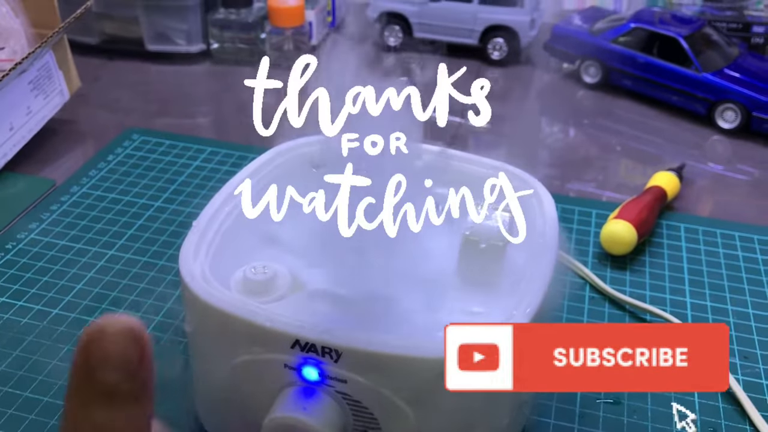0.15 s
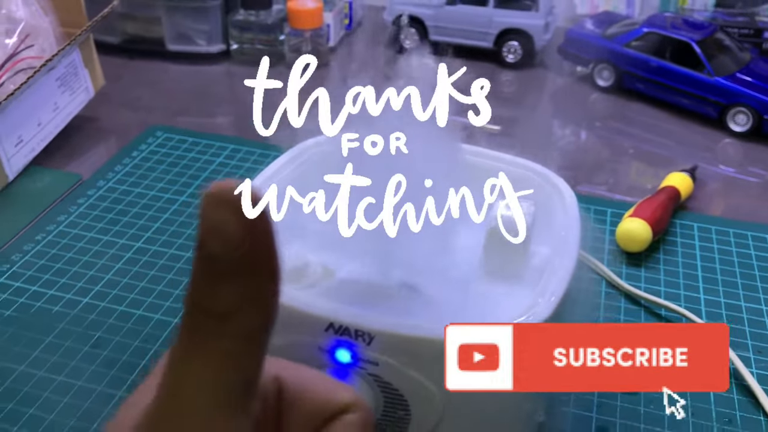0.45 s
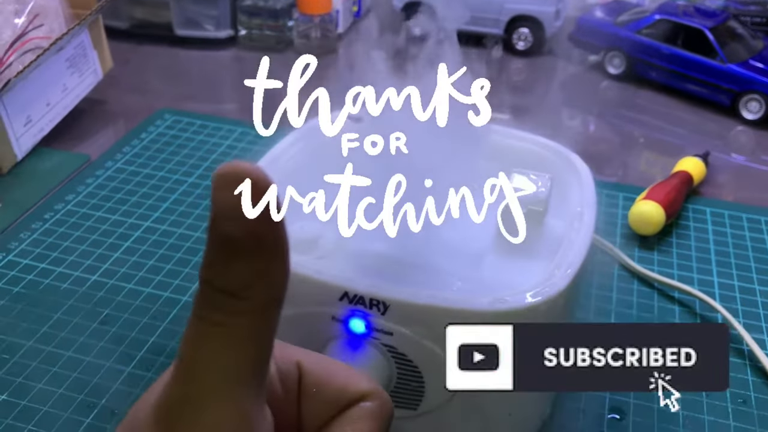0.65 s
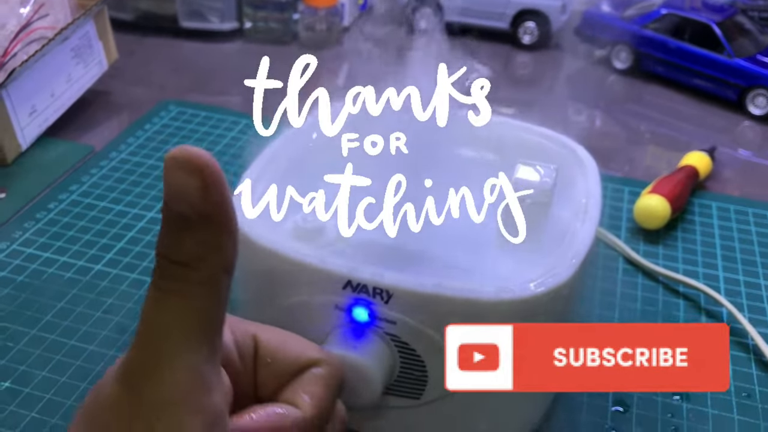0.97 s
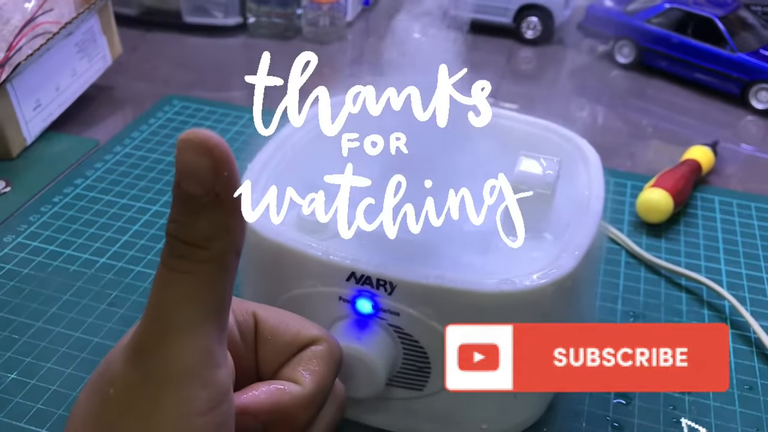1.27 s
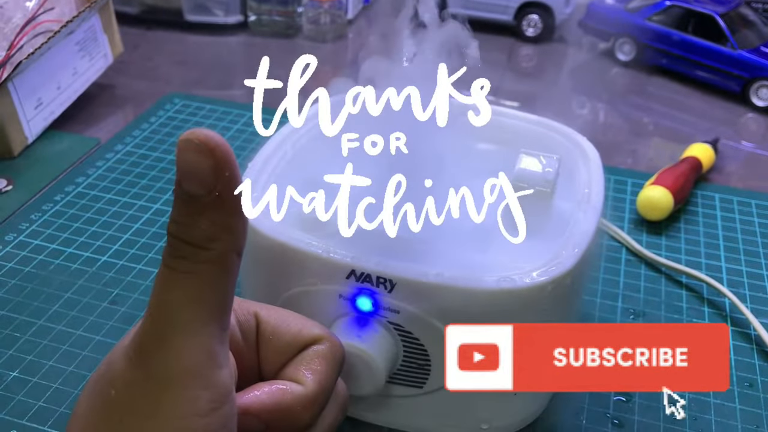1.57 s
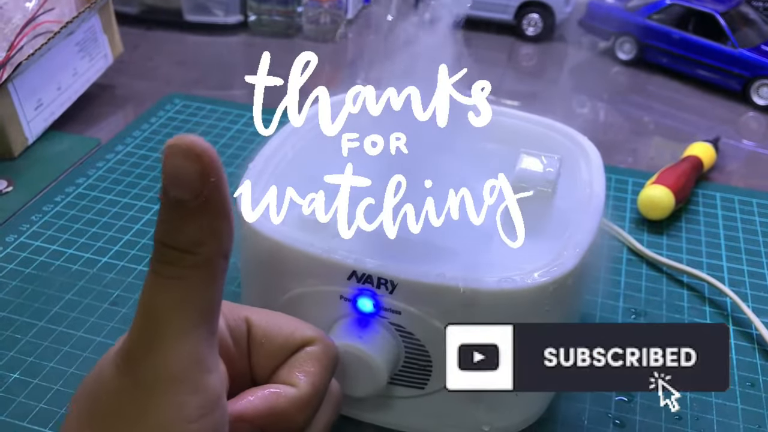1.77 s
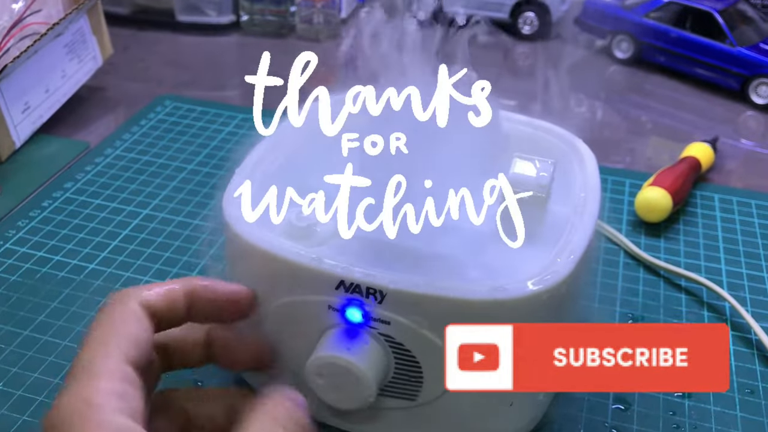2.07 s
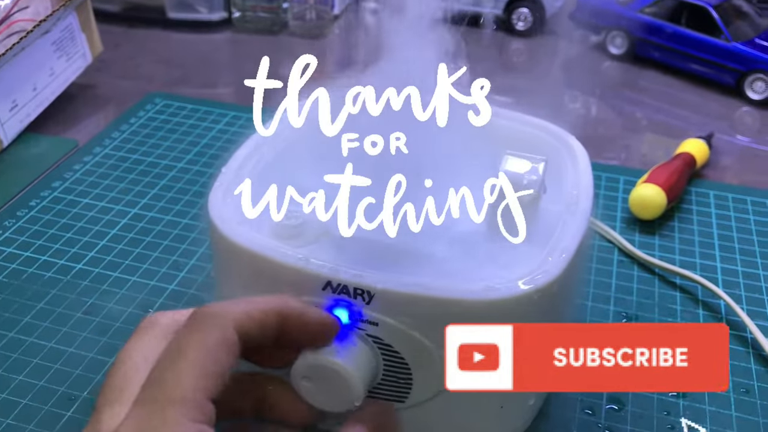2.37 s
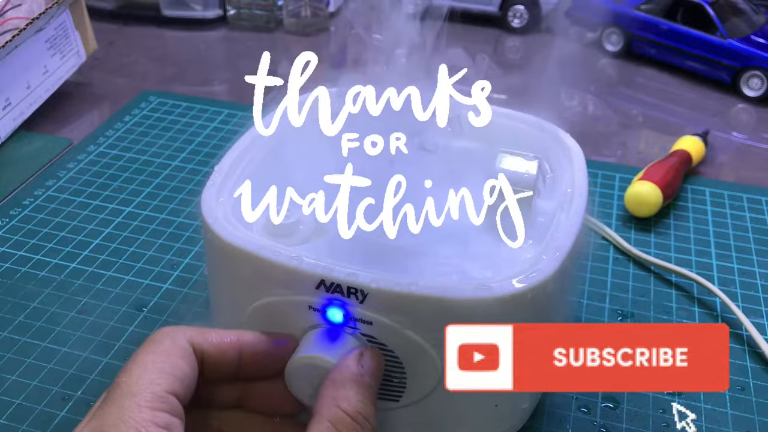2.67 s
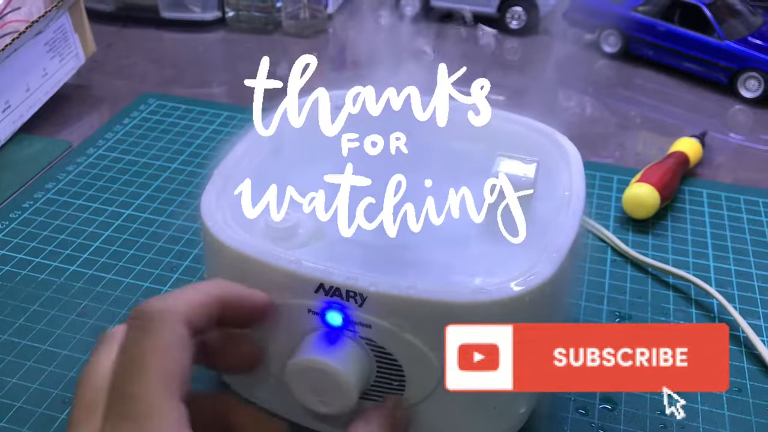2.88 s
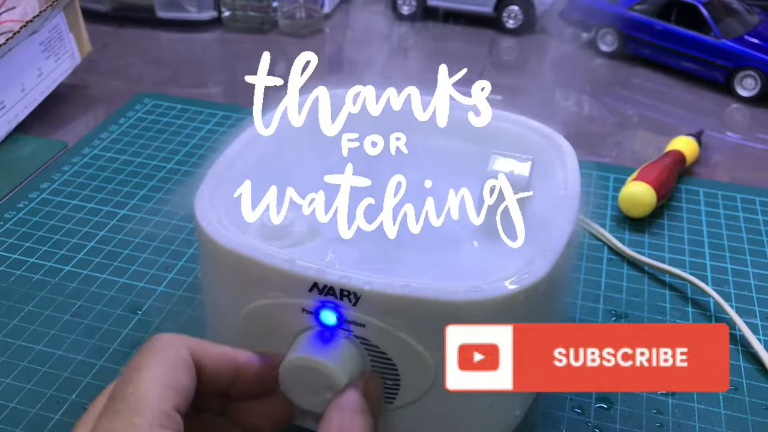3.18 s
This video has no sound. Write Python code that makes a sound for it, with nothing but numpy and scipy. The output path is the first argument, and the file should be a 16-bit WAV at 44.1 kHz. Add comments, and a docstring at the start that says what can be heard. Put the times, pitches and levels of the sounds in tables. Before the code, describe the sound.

A humidifier runs close to the microphone in a small room: airy mist hiss, low fan hum, fine droplet ticks, one watery plop, then plastic clicks from a hand before the hiss sinks.

```python
"""A small room, an ultrasonic humidifier on a table, one close microphone.
The mist fountain is fluttering noise with fine ringing spray; the fan is rushing noise, mains hum and whine.
Spray drops tick on the plastic tank as short rings, and one fat drop plops as a slap and two bubble tones.
A hand brushes the plastic in swells of noise and clicks on housing and knob, which ring in their modes.
It turns the knob down, and the hiss sinks; soft low tones are the thumps of the housing."""
import sys
import numpy as np
from scipy import signal
from scipy.fft import rfft, irfft
from scipy.io import wavfile

SR = 44100
rng = np.random.default_rng(int(sys.argv[2]) if len(sys.argv) > 2 else 0)


def pcm_store(signal):
    """Save signal as 16-bit PCM."""
    levels = np.round(np.clip(np.atleast_2d(signal), -1, 1) * 32767)
    wavfile.write(sys.argv[1], SR, levels.astype(np.int16).T)


N = 146853
T = np.arange(N) / SR
CUTOFF_HZ = 15850  # top of everything heard
ROOM_T60_S, ROOM_TOP_HZ = 0.11, 3300  # the small room's reflections


def from_db(db):
    """Decibels to gain."""
    return 10 ** (np.asarray(db) / 20)


def rms_one(x):
    """Scale to rms 1."""
    return x / np.sqrt(np.mean(x ** 2) + 1e-20)


def drift(hz):
    """Slow chance movement with rms 1: noise through two equal low-pass poles at hz."""
    step = 40  # samples between the slow values
    settle = 2000  # slow values dropped while the filter settles
    pole = np.exp(-2 * np.pi * hz * step / SR)
    noise = rng.standard_normal(N // step + 2 + settle)
    slow = signal.lfilter([1], [1, -2 * pole, pole * pole], noise)[settle:]
    return np.interp(np.arange(N) / step, np.arange(len(slow)), rms_one(slow))


def colour(x, spectrum):
    """Weight a sound by a spectrum drawn over log frequency; rms 1."""
    hz, db = np.transpose(spectrum)
    bins = np.maximum(np.arange(N // 2 + 1) * SR / N, 1)
    gain = from_db(np.interp(np.log(bins), np.log(hz), db))
    return rms_one(irfft(rfft(x) * gain, N))


def band(x, low, high):
    """Band-pass between two frequencies in Hz."""
    sos = signal.butter(2, [low, high], "band", fs=SR, output="sos")
    return signal.sosfilt(sos, x + 1e-18)


def soften(x, hz):
    """Low-pass."""
    return signal.sosfilt(signal.butter(2, hz, fs=SR, output="sos"), x + 1e-18)


def ring(x, hz, t60):
    """A two-pole resonator: each unit click sets a dying sine of height 1 ringing."""
    r = from_db(-60 / (t60 * SR))
    w = 2 * np.pi * hz / SR
    return signal.lfilter([0, np.sin(w)], [1, -2 * r * np.cos(w), r * r], x + 1e-18)


def dying(t60):
    """Time and envelope of a 60 dB decay."""
    t = np.arange(int(t60 * SR) + 2) / SR
    return t, np.exp(-np.log(1000) * t / t60)


def ping(hz, t60, swell=1e-6):
    """A sine that swells and dies."""
    t, fall = dying(t60)
    return np.sin(2 * np.pi * hz * t) * fall * (1 - np.exp(-t / swell))


def burst(t60):
    """Noise that dies, at most a second long."""
    t, fall = dying(t60)
    return rng.standard_normal(SR)[:len(t)] * fall[:SR]


def add(out, s, sound):
    """Mix a sound in at a time in seconds."""
    i = int(s * SR)
    out[i:i + len(sound)] += sound[:N - i]


def reflect(x, db, t60, top_hz=CUTOFF_HZ):
    """A sound with its dense, dying, duller reflections."""
    tail = burst(t60)
    tail = tail / np.linalg.norm(tail)
    return x + from_db(db) * soften(signal.fftconvolve(x, tail)[:N], top_hz)


PATCHY_HZ, PATCHY_DB = 9.5, 0.9  # each band of the hiss by itself


def fountain_hiss():
    """Noise in bands that waver separately."""
    edges = np.geomspace(1000, 19000, 13)
    hiss = np.zeros(N)
    for low, high in zip(edges, edges[1:]):
        hiss += band(rng.standard_normal(N), low, high) * from_db(PATCHY_DB * drift(PATCHY_HZ))
    return hiss


SPRAY_PER_S, SPRAY_SPREAD_DB, SPRAY_T60_S = 190, 2, 0.0009


def fountain_spray():
    """Fine crackling spray: chance clicks, each ringing very briefly at one of several pitches."""
    sizes = from_db(SPRAY_SPREAD_DB * np.minimum(rng.exponential(1, N), 4))
    signs = rng.choice([-1, 1], N)
    hits = sizes * signs * (rng.random(N) < SPRAY_PER_S / SR)
    pitches = np.linspace(5000, 15800, 14)
    dealt = rng.integers(0, len(pitches), N)
    spray = np.zeros(N)
    for k, hz in enumerate(pitches):
        spray += ring(hits * (dealt == k), hz, SPRAY_T60_S)
    return spray


# relative strength of the mist fountain: (time [s], level [dB])
MIST_STRENGTH = [(0, -1), (.38, 2.5), (.52, -1.5), (.85, -0.1), (1.15, 0.5), (1.55, 0.1), (2.25, 2.2),
                 (2.55, -1.5), (2.92, -2), (3.1, -7.5), (3.33, -9.5)]
# spectrum of the fountain, for hiss and spray: (frequency [Hz], relative level [dB per Hz])
HISS_SPECTRUM = [(1500, -16.5), (3200, -5), (4900, -10), (6200, -6), (7300, -9), (9600, -5.5), (10400, -8),
                 (11800, -3), (14800, -1), (16000, 5)]
HISS_DB, SPRAY_DB = -62.5, -76  # rms before the mist strength
FLUTTER_HZ, FLUTTER_DB = 13.7, 1.0  # whole fountain
MIST_ECHO_DB, MIST_ECHO_T60_S = -1.5, 0.038


def fountain():
    """Hiss, coloured by the tank walls, and spray flutter together and follow the strength of the mist."""
    strength_db = np.interp(T, *np.transpose(MIST_STRENGTH))
    flow = from_db(strength_db + FLUTTER_DB * drift(FLUTTER_HZ))
    hiss = fountain_hiss()
    spray = fountain_spray()
    hiss = reflect(hiss, MIST_ECHO_DB, MIST_ECHO_T60_S)
    hiss = from_db(HISS_DB) * colour(hiss, HISS_SPECTRUM)
    spray = from_db(SPRAY_DB) * colour(spray, HISS_SPECTRUM)
    return flow * (hiss + spray)


# air of the fan and the room: (frequency [Hz], relative level [dB per Hz])
AIR_SPECTRUM = [(22, -33), (28, -4.5), (34, 4), (45, -3.5), (75, 1), (100, -10), (135, -9), (175, -14),
                (215, -11), (255, -14), (320, -12), (520, -20), (650, -16), (780, -19), (900, -25),
                (1600, -25.5), (3000, -32), (6000, -36.5), (16000, -54)]
# resonances of the air duct: (frequency [Hz], width [Hz], level before the rumble cut [dB rms])
DUCT_RESONANCES = [(386.8, 39.7, -70.5), (434.2, 45.5, -67.5), (584.5, 23, -80), (1069, 66, -88),
                   (1254, 110, -81), (1920, 37, -94), (2629, 50, -87)]
# mains hum and fan whine: (frequency [Hz], level before the rumble cut [dB rms], rms pitch wobble [share])
HUM_AND_WHINE = [(61.36, -64.5, 0.0055), (295.7, -82.5, .003), (972.7, -80, 0.0016), (1952, -87.5, 0.00158),
                 (2673, -86.5, 0.005)]
AIR_DB, WOBBLE_HZ, RUMBLE_CUT_HZ = -63, 4.84, 25  # air level is rms before the rumble cut


def fan():
    """Rushing air, noise narrowed by duct resonances, and wobbling sines for hum and thin whine."""
    out = from_db(AIR_DB) * colour(rng.standard_normal(N), AIR_SPECTRUM)
    for hz, width, db in DUCT_RESONANCES:
        resonance = band(rng.standard_normal(N), hz - width / 2, hz + width / 2)
        out += from_db(db) * rms_one(resonance)
    for hz, db, wobble in HUM_AND_WHINE:
        pitch = hz * (1 + wobble * drift(WOBBLE_HZ))
        out += from_db(db) * rms_one(np.sin(2 * np.pi * np.cumsum(pitch) / SR))
    return signal.sosfilt(signal.butter(6, RUMBLE_CUT_HZ, "high", fs=SR, output="sos"), out)


# spray drops that hit the tank: (time [s], snap peak before reflections [dB], ring frequency [Hz])
TANK_DROPS = [(0.2943, -51, 3550), (0.369, -37.5, 14600), (.399, -41, 7000), (0.3998, -55.5, 4900),
              (0.427, -48, 11500), (0.437, -37, 13200), (.487, -47, 14400), (.599, -47, 12100),
              (0.687, -48, 12300), (.788, -46, 12400), (0.96, -40.5, 13400), (1.093, -44.5, 12200),
              (1.175, -58, 7300), (1.358, -45, 11700), (1.385, -48, 9200), (1.4447, -36, 14600),
              (1.5495, -47.5, 11800), (1.628, -36, 14100), (1.873, -45.5, 9000), (1.942, -42, 14300),
              (2.036, -39, 12900), (2.0688, -41.5, 8900), (2.081, -47, 14000), (2.2035, -43, 13700),
              (2.2222, -40, 9030), (2.317, -42, 10650), (2.549, -50.5, 8700), (2.675, -40.5, 13500),
              (2.805, -45, 14500), (2.9282, -53, 2850), (2.933, -40.5, 13600), (3.1982, -41.5, 12360)]
TICK_RING_CYCLES, TICK_RING_DB = 19.5, -0.5  # cycles to fall 60 dB; level against the snap
TICK_SNAP_WIDTH = 1.164  # frequency ratio from the centre to each edge
TANK_DB, TANK_T60_S = -0.5, 0.08


def ticks():
    """Larger spray drops snap (a band-passed click) and ring briefly inside the reflecting tank."""
    out = np.zeros(N)
    for s, db, hz in TANK_DROPS:
        snap = band(signal.unit_impulse(256), hz / TICK_SNAP_WIDTH, hz * TICK_SNAP_WIDTH)
        add(out, s, from_db(db) * snap / np.abs(snap).max())
        add(out, s, from_db(db + TICK_RING_DB) * ping(hz, TICK_RING_CYCLES / hz))
    return reflect(out, TANK_DB, TANK_T60_S)


# fingers brush the plastic: (middle [s], length [s], level at the middle [dB rms], frequency [Hz])
BRUSHES = [(0.548, 0.063, -71, 3260), (1.925, .07, -76.5, 4900), (2.595, 0.019, -74, 4300)]
BRUSH_WIDTH = 1.26  # frequency ratio from the centre to each edge


def rubbing():
    """Skin brushes over the plastic: a faint swish of band-passed noise that swells and fades."""
    out = np.zeros(N)
    for s, length, db, hz in BRUSHES:
        swell = np.exp(-(2 * (T - s) / length) ** 2)
        swish = rms_one(band(rng.standard_normal(N), hz / BRUSH_WIDTH, hz * BRUSH_WIDTH))
        out += from_db(db) * swell * swish
    return out


# bubbles of the fat drop: (time [s], level before swell and filter [dB], frequency [Hz], swell [s], t60 [s])
BUBBLES = [(1.3865, -36, 1107, 0.00014, 0.038), (1.3898, -29.5, 1208, 0.00094, 0.028)]
# levels of the drop are taken before its filters and reflections
SPLASH_S, SPLASH_DB, SPLASH_HZ, SPLASH_T60_S, SPLASH_TOP_HZ = 1.3853, -31, 2600, 0.0012, 4800
SPATTER_DB, SPATTER_T60_S, SPATTER_LOW_HZ, SPATTER_HIGH_HZ = -49.5, 0.093, 700, 4000
CAVITY_DB, CAVITY_HZ, CAVITY_T60_S = -45, 845, 0.025
PLOP_LOW_HZ, PLOP_HIGH_HZ, PLOP_ROOM_DB = 604, 6400, -9.5


def plop():
    """A fat drop slaps the water, spatters and knocks hollowly in the tank; two bubbles ring in turn."""
    out = np.zeros(N)
    slap = soften(ping(SPLASH_HZ, SPLASH_T60_S), SPLASH_TOP_HZ)
    spatter = band(burst(SPATTER_T60_S), SPATTER_LOW_HZ, SPATTER_HIGH_HZ)
    add(out, SPLASH_S, from_db(SPLASH_DB) * slap)
    add(out, SPLASH_S, from_db(SPATTER_DB) * spatter)
    add(out, SPLASH_S, from_db(CAVITY_DB) * ping(CAVITY_HZ, CAVITY_T60_S))
    for s, db, hz, swell, t60 in BUBBLES:
        add(out, s, from_db(db) * ping(hz, t60, swell))
    return reflect(band(out, PLOP_LOW_HZ, PLOP_HIGH_HZ), PLOP_ROOM_DB, ROOM_T60_S, ROOM_TOP_HZ)


# soft thumps of the housing: (time [s], level before the swell [dB], frequency [Hz], swell [s], t60 [s])
THUMPS = [(1.391, -39, 66.3, 0.013, 0.15), (2.94, -29.5, 62.4, 0.025, .13)]


def housing_thumps():
    """The housing thumps gently: low sines that swell and die."""
    out = np.zeros(N)
    for s, db, hz, swell, t60 in THUMPS:
        add(out, s, from_db(db) * ping(hz, t60, swell))
    return out


CLICK_CRACK_DB, CLICK_CRACK_T60_S = -11, 0.0024  # against the level of the click
CRACKLE_PER_S, CRACKLE_DB, CRACKLE_T60_S = 900, -14, 0.085


def strike(clicks, modes, low_hz):
    """Each contact cracks and rings the modes of a plastic part, then slips in a short, ragged crackle."""
    out = np.zeros(N)
    for s, db, contact_hz in clicks:
        hit = np.zeros(N)
        add(hit, s, from_db(CLICK_CRACK_DB) * burst(CLICK_CRACK_T60_S))
        for hz, mode_db, t60 in modes:
            add(hit, s, from_db(mode_db) * ping(hz, t60))
        # sparse, dying copies of the hit
        slips = from_db(CRACKLE_DB) * burst(CRACKLE_T60_S)
        slips = slips * (rng.random(SR)[:len(slips)] < CRACKLE_PER_S / SR)
        crackle = signal.fftconvolve(hit, slips)[:N]
        out += from_db(db) * band(hit + crackle, low_hz, contact_hz)
    return out


# clicks on the housing: (time [s], gain on the modes [dB], upper edge set by the contact [Hz])
HOUSING_CLICKS = [(2.0597, -34, 12000), (2.0675, -57, 3530)]
# modes of the plastic housing: (frequency [Hz], relative level [dB], t60 [s])
HOUSING_MODES = [(1227, -18.5, 0.04), (1400, -7.5, 0.022), (1610, -12, 0.015), (1900, -9, 0.017),
                 (2280, -9, 0.013), (2630, -7.5, 0.011), (3140, -10, 0.01), (4300, -11.5, 0.0057),
                 (5000, -10.5, 0.0051), (6000, -18.5, 0.005), (8240, -15, 0.0075), (11500, -1, 0.0027)]
# clicks of the fingers on the knob: (time [s], gain on the modes [dB], upper edge set by the contact [Hz])
FINGER_CLICKS = [(2.1195, -47.5, 2200), (2.541, -55, 4000), (2.7921, -42, 9000), (2.838, -57, 5000),
                 (2.929, -51, 2400)]
# modes of the knob on its shaft: (frequency [Hz], relative level [dB], t60 [s])
KNOB_MODES = [(350, -11, .035), (630, -12, .03), (985, -11, .035), (1200, -13, .028), (1440, -14, .012),
              (3280, -12, .011), (4600, -8, .006), (6200, -11, .004)]
HOUSING_LOW_HZ, KNOB_LOW_HZ, CLICK_ROOM_DB = 1110, 265, -4.5


def hand():
    """Fingers click on the housing and the knob, duller for a softer contact, and the room answers."""
    housing = strike(HOUSING_CLICKS, HOUSING_MODES, HOUSING_LOW_HZ)
    knob = strike(FINGER_CLICKS, KNOB_MODES, KNOB_LOW_HZ)
    return reflect(housing + knob, CLICK_ROOM_DB, ROOM_T60_S, ROOM_TOP_HZ)


def scene():
    """Everything at one close microphone."""
    machine = fountain() + fan()
    drops = ticks() + plop()
    handling = hand() + housing_thumps() + rubbing()
    return (machine + drops + handling)[None]


def record(dry):
    """The top is cut steeply by an elliptic low-pass."""
    return signal.sosfilt(signal.ellip(12, 0.1, 70, CUTOFF_HZ, fs=SR, output="sos"), dry)


dry = scene()
out = record(dry)
pcm_store(out)
```